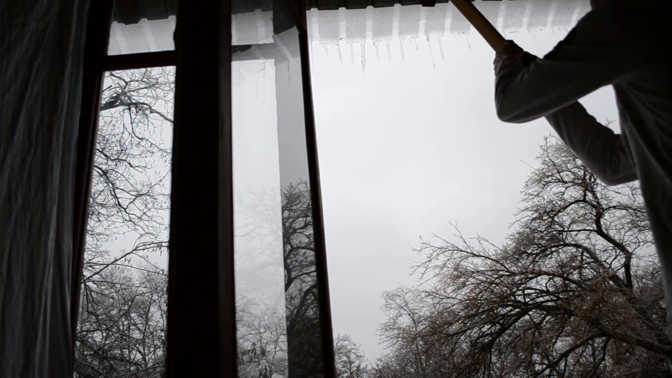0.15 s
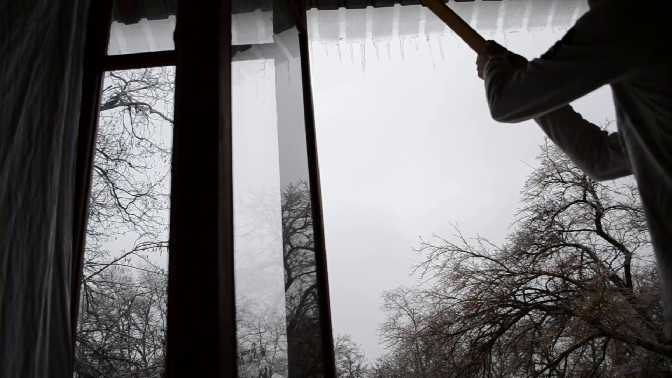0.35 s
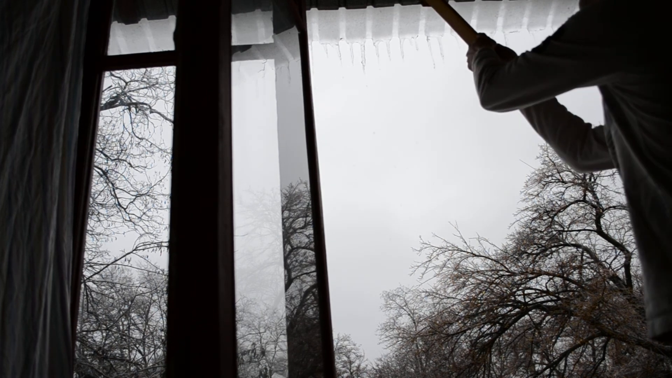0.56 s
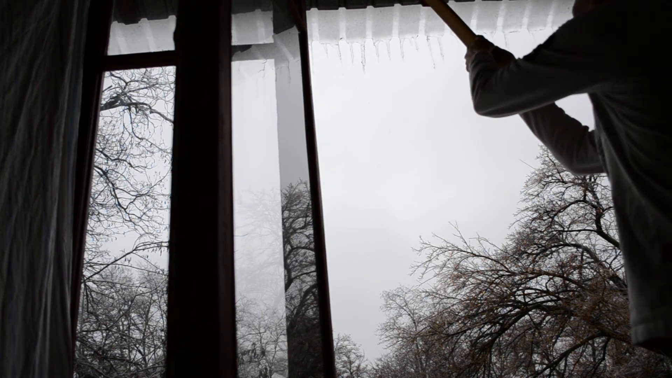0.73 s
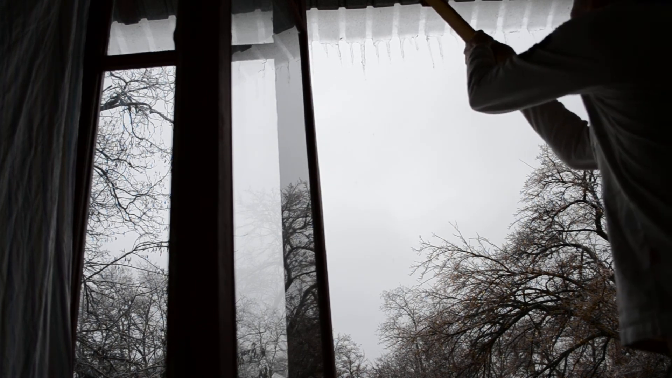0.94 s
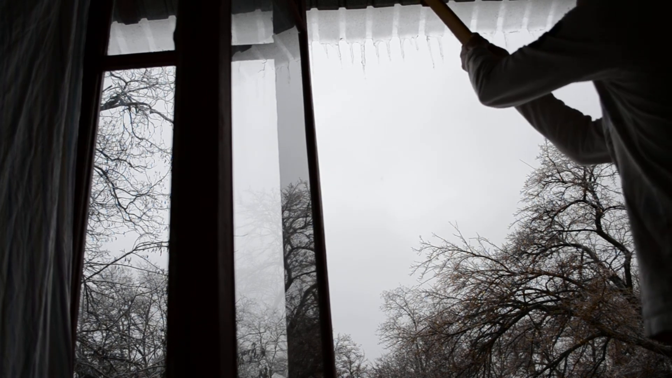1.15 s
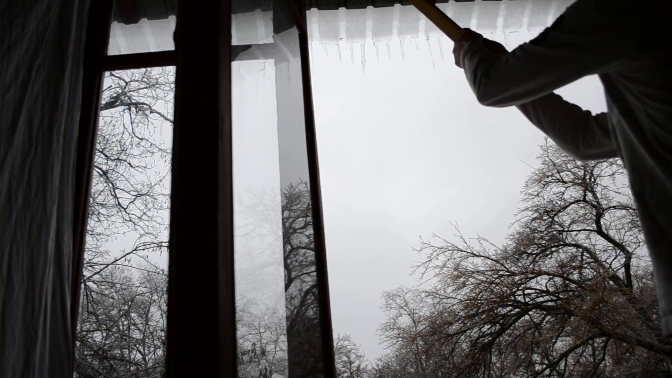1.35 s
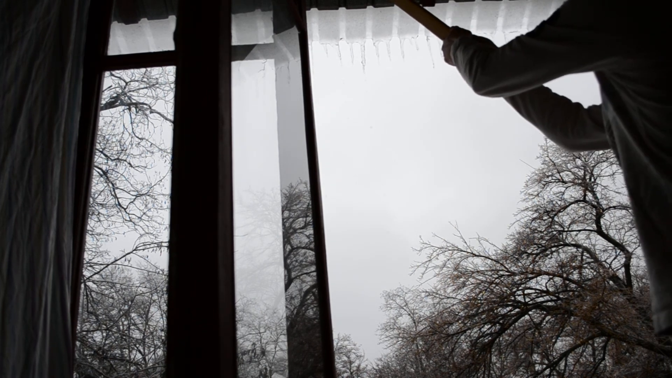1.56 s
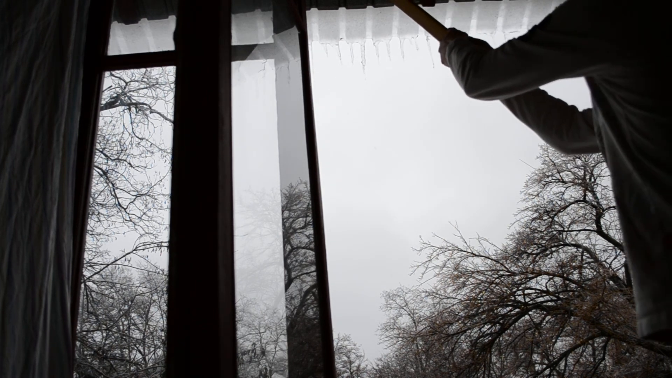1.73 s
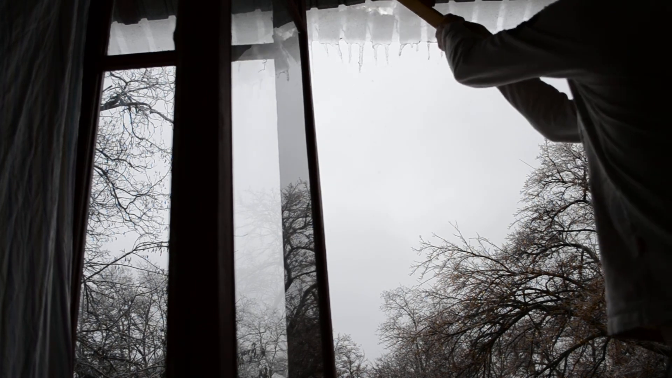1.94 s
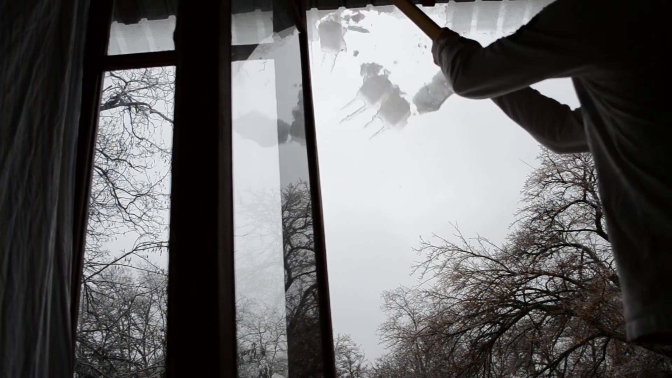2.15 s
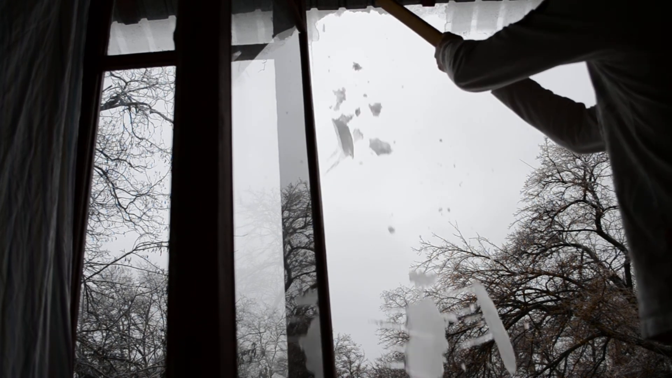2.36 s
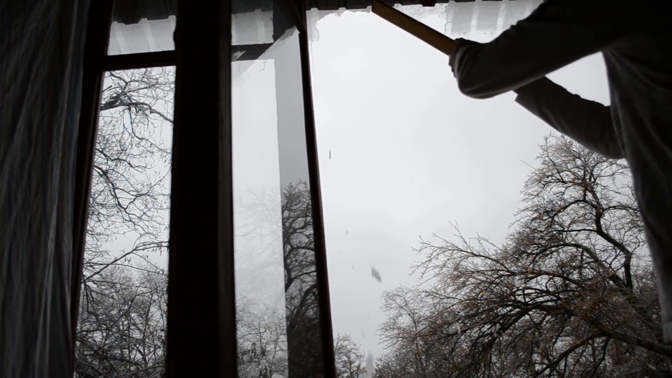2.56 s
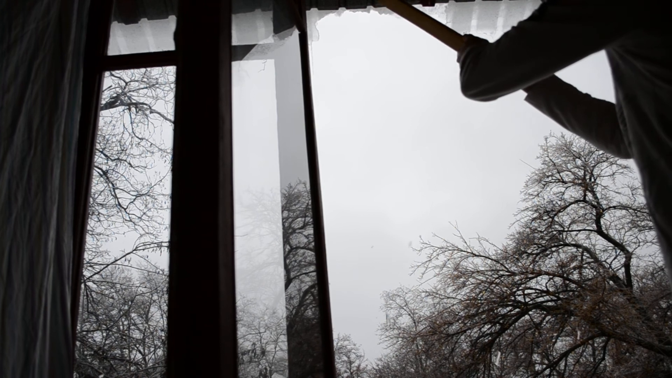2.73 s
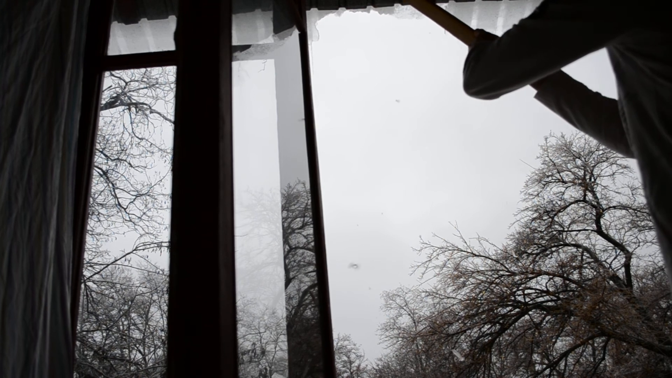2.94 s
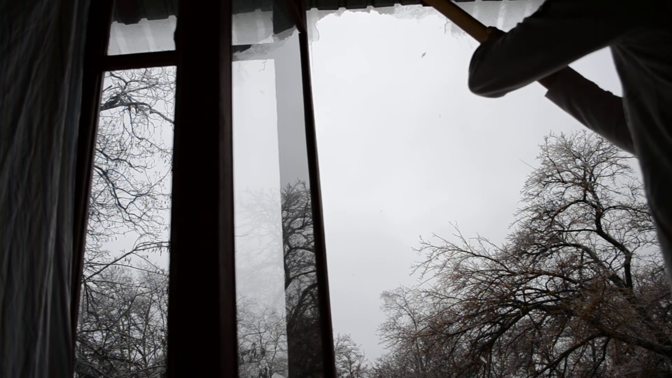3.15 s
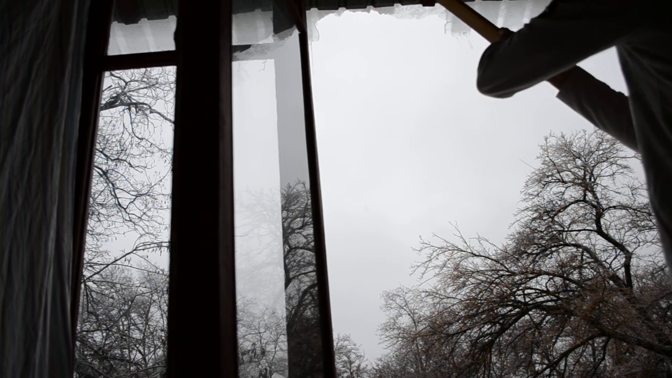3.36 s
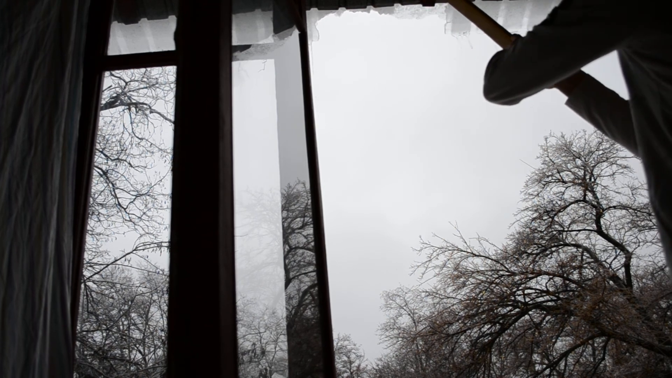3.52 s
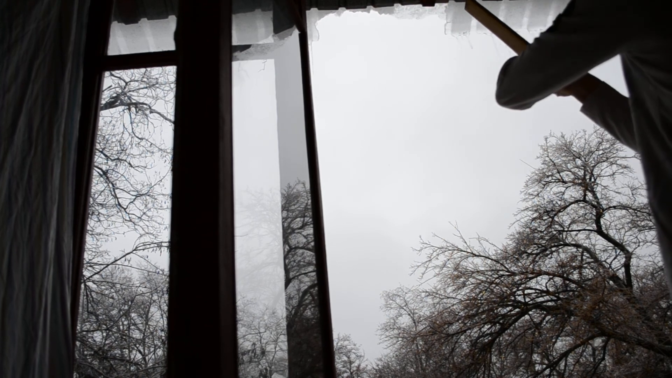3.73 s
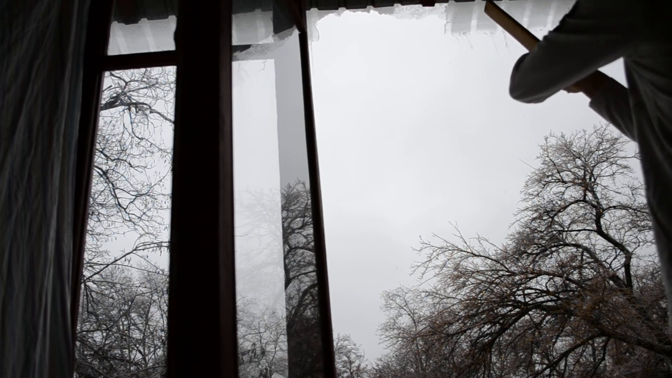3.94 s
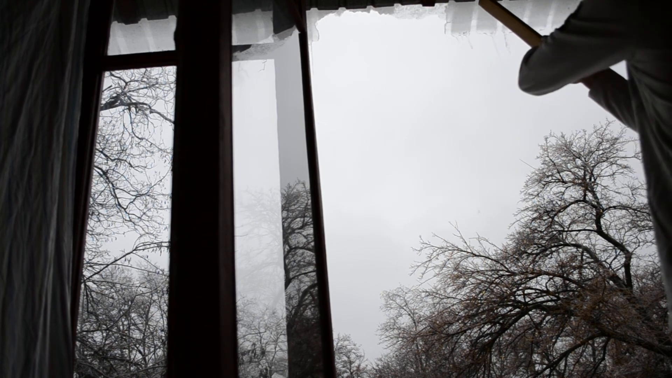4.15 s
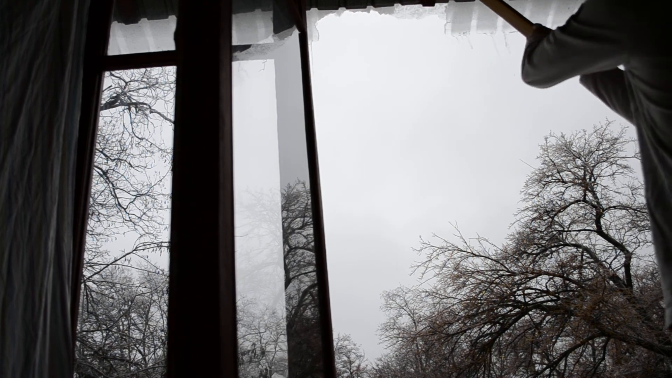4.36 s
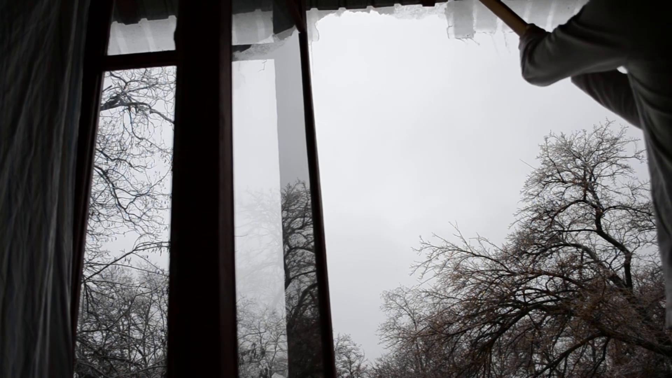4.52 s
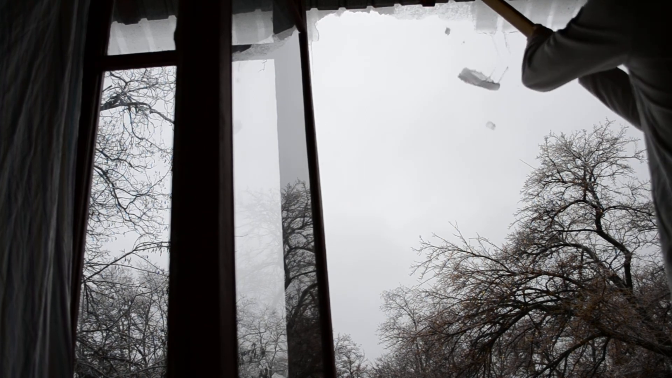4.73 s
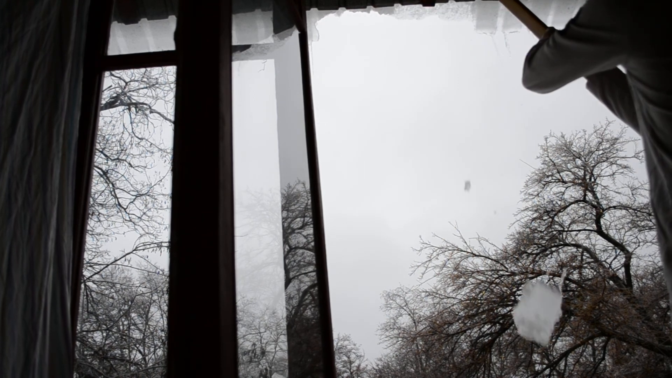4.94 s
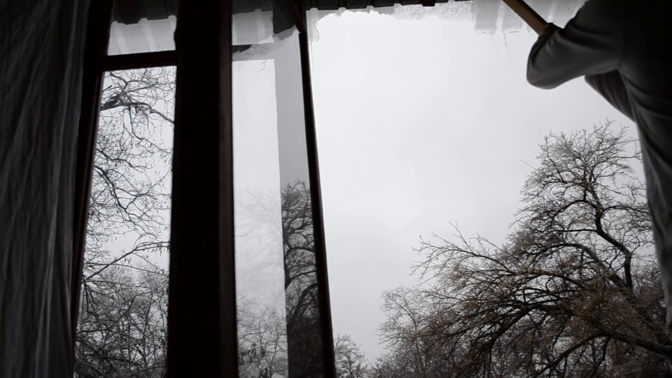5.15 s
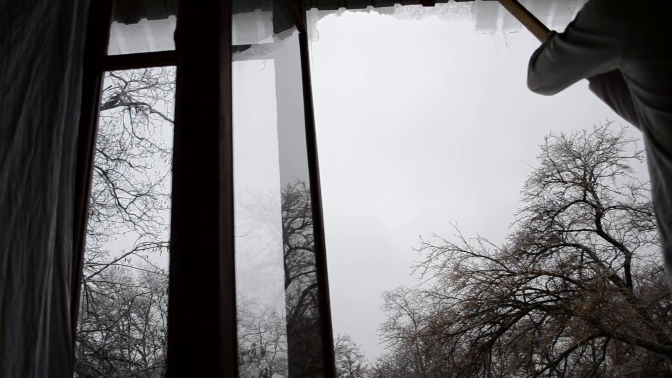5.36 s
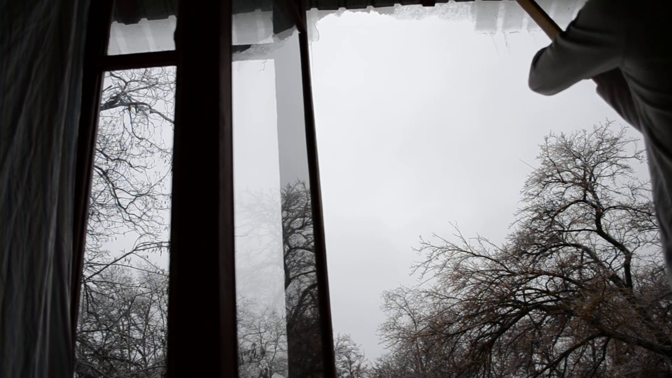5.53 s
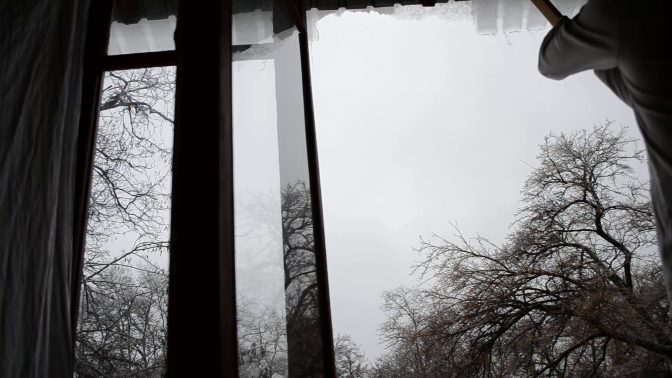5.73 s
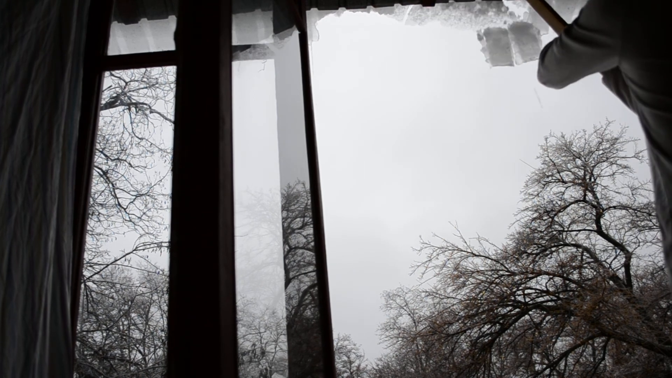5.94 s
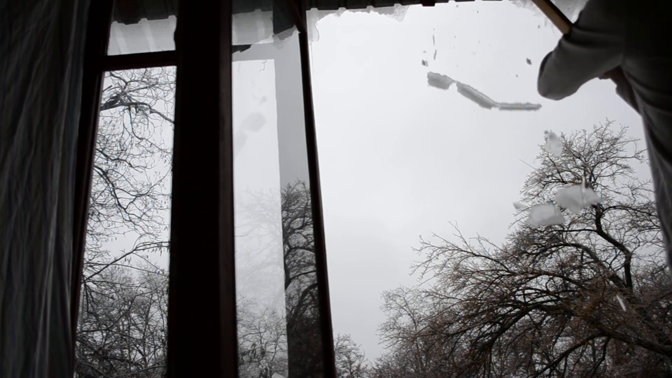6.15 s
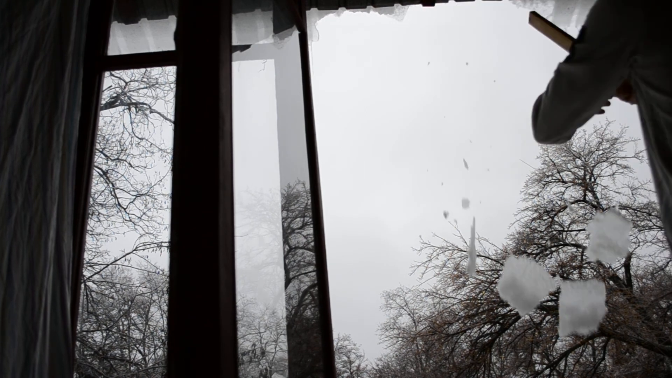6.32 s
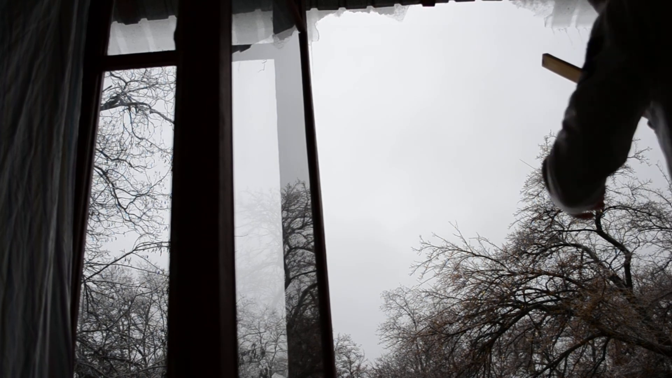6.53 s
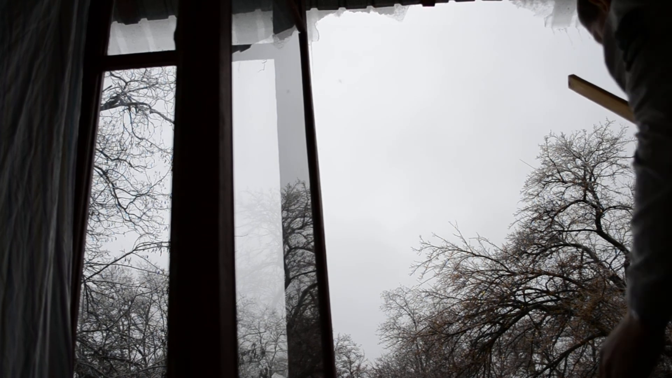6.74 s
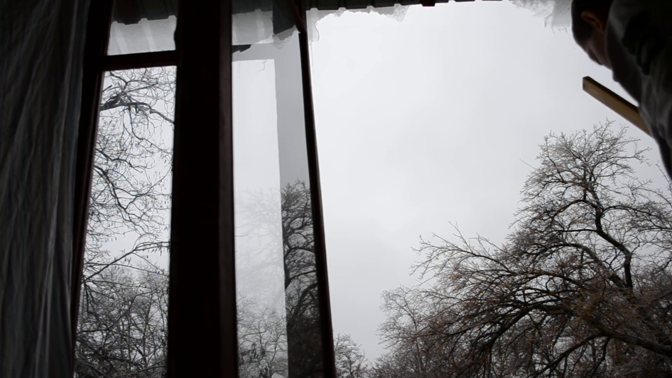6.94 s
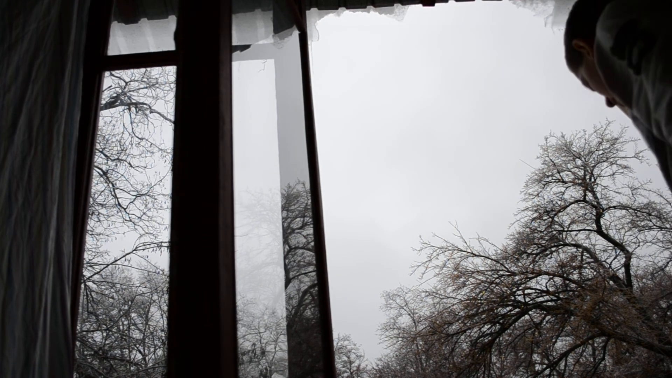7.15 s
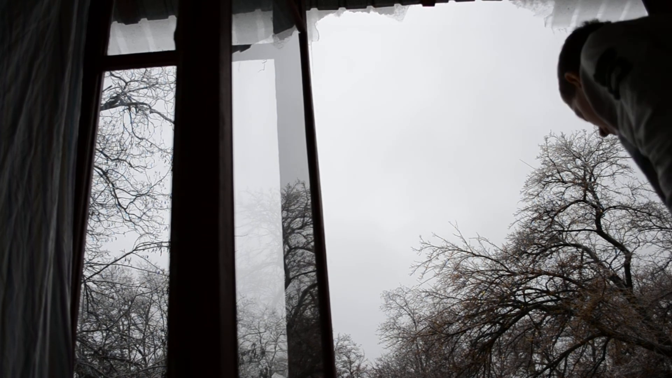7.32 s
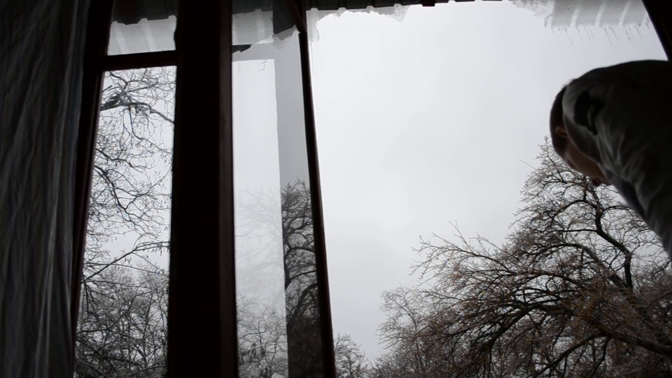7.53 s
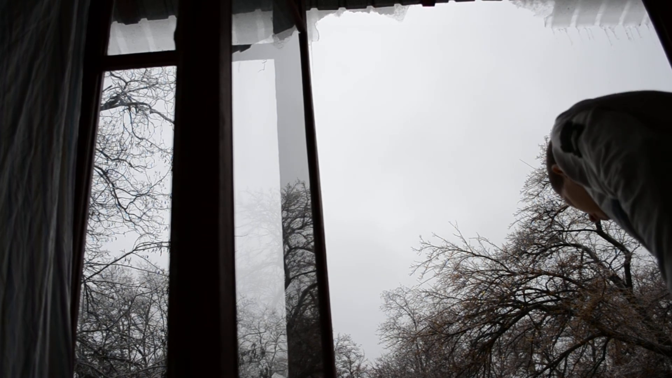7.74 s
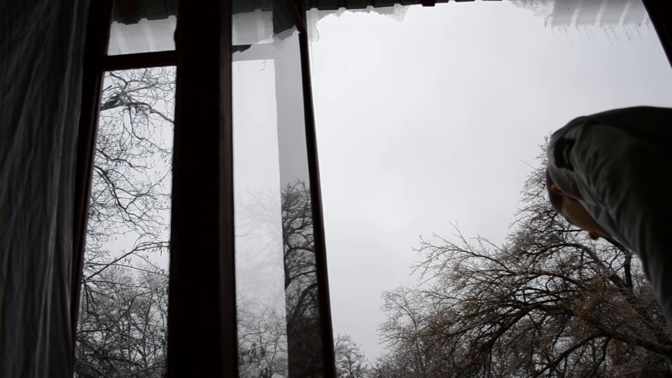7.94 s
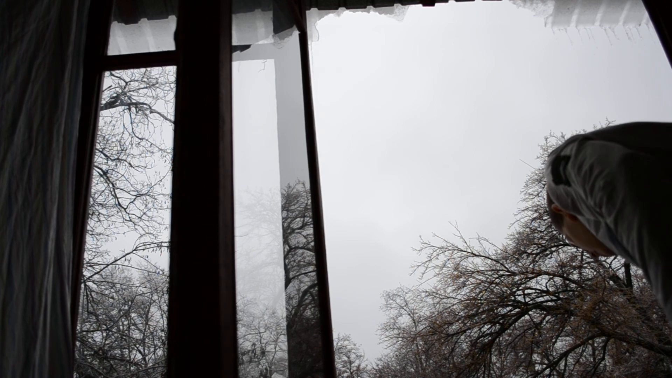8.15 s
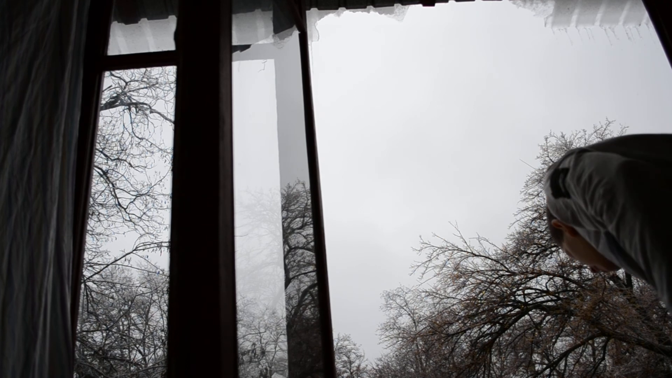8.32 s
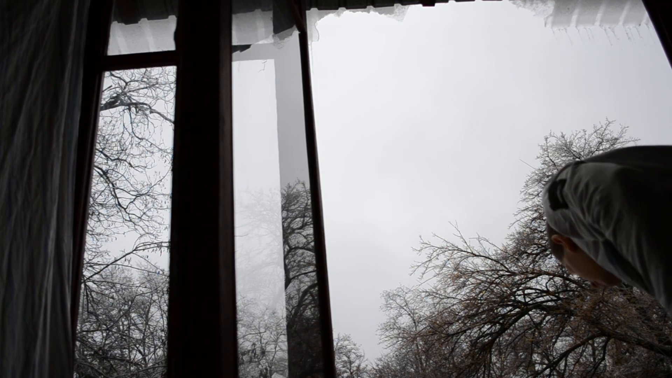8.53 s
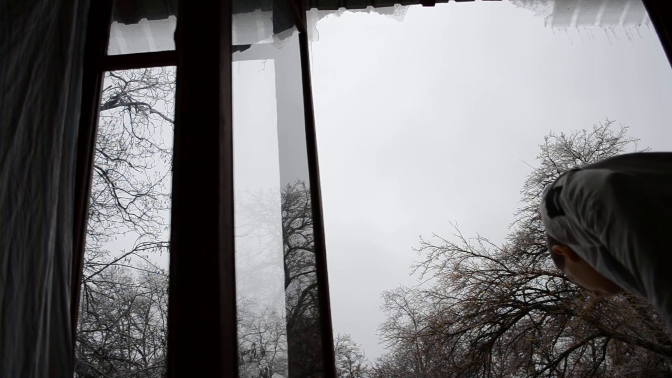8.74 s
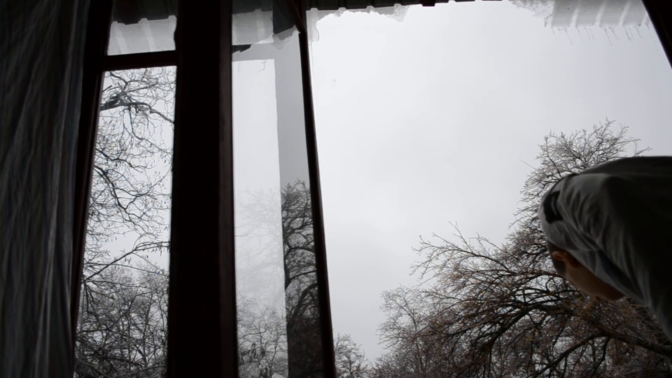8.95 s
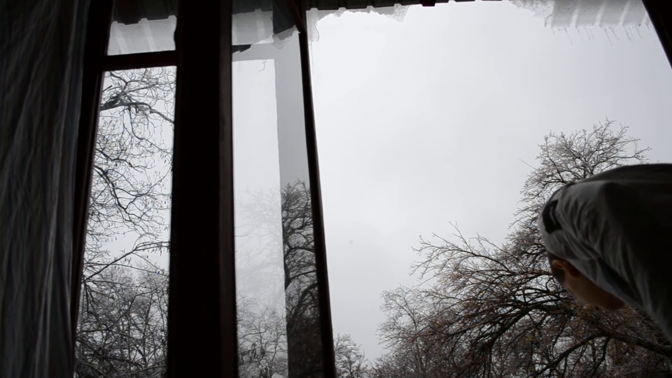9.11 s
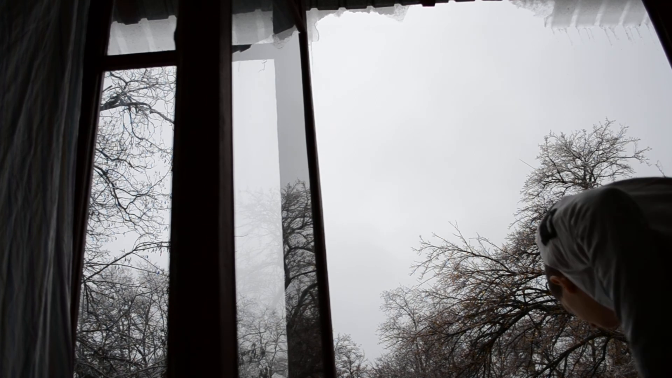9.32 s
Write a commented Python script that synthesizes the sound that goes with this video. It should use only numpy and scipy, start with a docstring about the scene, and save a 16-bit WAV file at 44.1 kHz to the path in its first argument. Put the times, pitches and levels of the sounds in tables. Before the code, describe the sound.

A wooden stick thuds on an icy eave; ice squeaks, cracks, tears loose and smashes below, then cloth rustles as a man bends.

```python
"""Over a faint winter hush, a wooden stick thuds on the eave: a man at a window knocks icicles off the roof edge.
Ice cracks, squeaks and tears loose, then smashes on the ground below and skitters away.
Late on, a footstep falls and his jacket rustles as he bends forward to look down; a few faint ticks stray in.
Hits are swells of tiny random clicks with short echoes; tearing, scatter and cloth are runs of noise grains.
Squeaks are rough sliding whistles, loose bits of ice clink like small bars, and the hush is filtered noise."""
import sys
import numpy as np
from scipy import signal
from scipy.fft import rfft, irfft, next_fast_len
from scipy.io import wavfile

SR = 44100
rng = np.random.default_rng(int(sys.argv[2]) if len(sys.argv) > 2 else 0)


def wav_record(signal):
    """Record a signal, one row per channel, as 16-bit PCM in the file named by sys.argv[1]."""
    frames = np.transpose(np.atleast_2d(signal))
    bounded = np.clip(frames, -1, 1)
    # unit amplitude maps onto the largest positive 16-bit level
    quanta = np.round(bounded * 32767).astype(np.int16)
    wavfile.write(sys.argv[1], SR, quanta)


N = 413658  # samples in the scene


def from_db(db):
    """Turn decibels into a plain gain."""
    return 10 ** (np.asarray(db) / 20)


def unit(x):
    """Scale a sound to an energy of one."""
    return x / np.sqrt(np.sum(x ** 2) + 1e-20)


def at_hz(points, hz):
    """Read a spectrum between its points, along a logarithmic pitch axis."""
    point_hz, point_db = np.transpose(points)
    return np.interp(np.log(np.maximum(hz, 1)), np.log(point_hz), point_db)


def coloured(x, points):
    """Filter to the given spectrum without any sound before the event (minimum phase)."""
    n = 2 * next_fast_len(len(x) // 2 + 1)
    gain = from_db(at_hz(points, np.fft.rfftfreq(n, 1 / SR)))
    cepstrum = irfft(np.log(gain))
    # folding the second half onto the first makes the filter causal
    cepstrum[1:n // 2] *= 2
    cepstrum[n // 2 + 1:] = 0
    response = np.exp(rfft(cepstrum))
    return irfft(rfft(x, n) * response)[:len(x)]


def resonate(x, modes):
    """Lift or dip a narrow band for each resonance."""
    for hz, width_hz, db in modes:
        b, a = signal.iirpeak(hz, hz / width_hz, fs=SR)
        x = x + (from_db(db) - 1) * signal.lfilter(b, a, x)
    return x


def evened(burst):
    """Give all parts of the spectrum about the same power, but keep the fine ripple."""
    power, hz = np.abs(rfft(burst)) ** 2, np.fft.rfftfreq(len(burst), 1 / SR)
    correction = []
    for centre in np.geomspace(100, 12000, 12):
        nearby = abs(hz - centre) < 60 + centre / 4
        correction.append((centre, -10 * np.log10(power[nearby].mean())))
    return coloured(burst, correction)


# edges of the four pitch ranges, from low to high: thump, body, crack, splinter (f/Hz)
RANGE_EDGES_HZ = [130, 400, 1200, 4000, 11000]
RANGE_HZ = np.sqrt(np.multiply(RANGE_EDGES_HZ[:-1], RANGE_EDGES_HZ[1:]))  # middle of each range


def range_spectrum(levels, rumble_db):
    """Spread four range levels into a spectrum, with a hollow below the thump and a deep rumble under it."""
    thump, body, crack, splinter = (db - 10 * np.log10(2 * width / SR)
                                    for db, width in zip(levels, np.diff(RANGE_EDGES_HZ)))
    # light objects lose their bass sooner than heavy ones
    weight = np.clip(thump - body, -10, 2)
    bass = thump + 0.42 * weight
    return [(18, bass + rumble_db - 9.5), (38, bass + rumble_db), (68, bass - 21), (185, bass),
            (300, thump - 0.078 * weight), (680, body), (1350, (body + crack) / 2 - 1),
            (2800, crack), (5200, splinter), (10500, splinter - 7)]


def voiced(colour, db, brightness=0, focus=0):
    """Set four range levels: a colour tilted around the crack range and narrowed towards it."""
    octaves = np.log2(RANGE_HZ / RANGE_HZ[2])
    return db + np.array(colour) + brightness * octaves - focus * np.array([1.5, 1, 0, 1])


def runs(events, lasts=1):
    """Each run rises, holds and dies away; overlaps add up to rows of (t/s, four range levels/dB)."""
    end = max(s + hold + t60 / 2 for s, _, hold, t60, _ in events)
    t = np.arange(events[0][0], end, .002)
    power = 1e-10
    for s, rise, hold, t60, levels in events:
        age = t[:, None] - s
        fall_db = -60 * np.maximum(age - rise - hold, 0) / (t60 * np.array(lasts))
        power = power + (np.clip(age / rise, 0, 1) * from_db(levels + fall_db)) ** 2
    return np.column_stack([t, 10 * np.log10(power)])


def grains(size, per_s, spread_db):
    """Random clicks, many small and a few large."""
    sizes = from_db(spread_db * np.minimum(rng.exponential(1, size), 4))
    signs = rng.choice([-1, 1], size)
    return sizes * signs * (rng.random(size) < per_s / SR)


# time for the echoes to fade by 60 dB, in the window recess and in the room behind it
RECESS_T60_S, ROOM_T60_S = 0.09, 0.32


def strikes(rows, contact, echo_db, tail_db, rumble_db, ring_db=0, ring_q=1):
    """A first contact and a swell of tiny clicks, echoed by the window recess and the room."""
    out, t = np.zeros(N + SR), np.arange(SR // 2) / SR
    click = 1.0 * (t == 0)
    for s, swell, *ring_hz, thump, body, crack, splinter in rows:
        age = t / max(swell, 1 / SR)
        tiny_clicks = unit(grains(len(t), 9000, 1.52) * age * np.exp(-age))
        # echoes start a few thousandths of a second after the hit
        recess = unit(grains(len(t), 4000, 2.64) * from_db(-60 * t / RECESS_T60_S) * (t > .003))
        room = unit(rng.standard_normal(len(t)) * from_db(-60 * t / ROOM_T60_S) * (t > .012))
        space = click + from_db(echo_db) * recess + from_db(tail_db) * room
        # the first contact is a dull push, weaker in a slow swell; the treble comes from the tiny clicks
        push = contact * np.exp(-swell / 0.007) * unit(np.exp(-6 * age))
        burst = evened(signal.fftconvolve(push + tiny_clicks, space)[:len(t)])
        # the spot that is hit decides which resonance speaks most
        burst = resonate(burst, [(hz, hz / ring_q, ring_db) for hz in ring_hz])
        burst = coloured(burst, range_spectrum((thump, body, crack, splinter), rumble_db))
        start = round(s * SR)
        # a level is the strike's energy spread over a fiftieth of a second
        out[start:start + len(t)] += burst * np.sqrt(SR / 50)
    return out[:N]


def crunch(rows, per_s, spread_db, grain_s, together, blur, rumble_db):
    """Short noise grains: some sound in all bands at once, some in one band, the far ones blur to a hiss."""
    s, *levels = np.transpose(rows)
    start, stop = int(s[0] * SR), min(int(s[-1] * SR), N)
    t, out = np.arange(start, stop) / SR, np.zeros(N)
    anchors, curves = zip(*range_spectrum(levels, rumble_db))
    shared = grains(len(t), per_s, spread_db) ** 2
    edges = np.geomspace(24, 12288, 16)
    together, blur = np.clip([together, blur], 0, 1)
    for low, high in zip(edges, edges[1:]):
        hz = np.sqrt(low * high)
        db = [np.interp(np.log(hz), np.log(anchors), row) for row in np.transpose(curves)]
        own = grains(len(t), per_s, spread_db) ** 2
        hits = together * shared + (1 - together) * own
        # low grains ring longer than high ones; grain_s holds at 2000 Hz
        fade = np.exp(-2 / (grain_s * np.sqrt(2000 / hz) * SR))
        patter = signal.lfilter([1], [1, -fade], hits + 1e-18)
        power = blur + (1 - blur) * patter / patter.mean()
        drive = rng.standard_normal(len(t)) * np.sqrt(power) * from_db(np.interp(t, s, db))
        band = signal.butter(2, [low, high], "band", fs=SR, output="sos")
        out[start:stop] += signal.sosfilt(band, drive)
    return out


# outdoor hush, its colour: (f/Hz, level per Hz/dB, relative)
HUSH = [(20, -22), (42, 1.5), (75, -12), (170, -5.5), (450, -2), (800, -4.5), (1400, -5.5), (3000, -10.5),
        (5500, -14), (10000, -22.5)]
HUSH_DB = -56.5  # average (rms) level before the microphone colour


def hush():
    """Steady distant noise, made by filtering random noise to a fixed colour."""
    return from_db(HUSH_DB) * np.sqrt(N) * unit(coloured(rng.standard_normal(N), HUSH))


# quick scuffs of the jacket, and a few faint stray ticks:
# (t/s, swell time/s, level/dB, brightness/dB per octave)
SCUFFS_AND_TICKS = [(1.398, 0.0029, -57.5, 2.5), (6.202, 0.0013, -60, -3.5), (7.079, 0.0015, -45, -.5),
                    (7.199, .0015, -41, 3), (7.238, 0.0038, -36, -0.5), (7.351, 0.0053, -41.5, 2),
                    (7.498, 0.0074, -39, 0), (7.78, 0.0013, -52.5, -4.5), (7.943, 0.0054, -43, 0),
                    (8.014, 0.00092, -50, -2.5), (8.11, 0.0016, -54, -1.5), (8.188, 0.0032, -48.5, -1.5),
                    (8.445, 0.0018, -60, 4), (8.949, 0.002, -65, 7)]
# jacket rubbing as he bends forward: (t/s, level/dB)
RUSTLE = [(6.95, -72), (7.012, -49.5), (7.5, -41.5), (7.91, -47.5), (8.212, -59), (8.7, -63)]
# colours of scuffs and ticks, and of rubbing: (thump, body, crack, splinter; each level/dB, relative)
SCUFF_DB = [-15, -1.5, 1.5, 1]
RUSTLE_DB = [-21.5, -9, -9, -5]
# papery colour of the whole layer: (f/Hz, width/Hz, gain/dB)
CLOTH = [(1500, 430, 5.5)]
# a soft slide follows each scuff or tick; its level is relative to that row
SLIDE_RISE_S, SLIDE_T60_S, SLIDE_DB = 0.026, 0.4, -12


def jacket_and_ticks():
    """Cloth rubs in fine grains, catches in quick scuffs and slides on; a few faint stray ticks sound alike."""
    scuffs = [(s, swell, *voiced(SCUFF_DB, db, brightness)) for s, swell, db, brightness in SCUFFS_AND_TICKS]
    slides = runs([(s, SLIDE_RISE_S, 0, SLIDE_T60_S, voiced(SCUFF_DB, db + SLIDE_DB))
                   for s, _, db, _ in SCUFFS_AND_TICKS])
    rubbing = [(s, *voiced(RUSTLE_DB, db)) for s, db in RUSTLE]
    layer = strikes(scuffs, contact=0.4, echo_db=-5.5, tail_db=-5, rumble_db=-10)
    for levels in (slides, rubbing):
        layer += crunch(levels, per_s=550, spread_db=9, grain_s=0.0038,
                        together=0.83, blur=0.54, rumble_db=-23)
    return resonate(layer, CLOTH)


# thin falling squeaks just before the ice gives: (t/s, length/s, start f/Hz, end f/Hz, level/dB)
SQUEAKS = [(0.66, 0.18, 4100, 3110, -59), (1.268, .14, 3180, 3150, -70), (1.673, 0.15, 4000, 3350, -52.5)]


def squeaks(width_hz):
    """A rough, narrow whistle slides down: a sine whose strength wavers at random."""
    out = np.zeros(N)
    for s, length, from_hz, to_hz, db in SQUEAKS:
        n, start = int(length * SR), int(s * SR)
        slow = signal.butter(2, width_hz, fs=SR, output="sos")
        waver = signal.sosfilt(slow, rng.standard_normal(n))
        tone = waver * np.sin(2 * np.pi * np.cumsum(np.geomspace(from_hz, to_hz, n)) / SR)
        out[start:start + n] += from_db(db) * np.sqrt(n) * unit(tone * signal.windows.tukey(n))
    return out


# shoves of the stick that tear ice off the roof edge:
# (t/s, rise/s, time to fade by 60 dB/s, level/dB, brightness/dB per octave)
TEARS = [(0.70, 0.013, 3, -50, 0.5), (1.005, .01, 0.13, -58, -5), (1.07, 0.0089, 0.31, -55, -2.5),
         (1.746, 0.013, .4, -46, 1), (1.79, 0.029, 0.65, -37, -1), (1.825, 0.036, 0.37, -28, -0.1),
         (1.903, 0.0085, 0.17, -39.5, -1), (1.96, 0.018, 0.4, -32.5, -0.5), (4.399, 0.016, 0.36, -37, -1.5),
         (4.6, 0.043, 1.25, -52, -1), (4.77, 0.0097, 0.21, -55, -1), (5.17, 0.0081, 1.65, -51, -4),
         (5.283, 0.0039, 0.21, -43.5, 0), (5.73, 0.011, 1.3, -37.5, -1), (5.828, .015, 0.22, -31.5, -.5),
         (5.909, .02, 0.19, -35, -1.5)]
# colour of tearing ice: (thump, body, crack, splinter; each level/dB, relative)
TEAR_DB = [-7, -1.5, -1.5, -4]


def tearing():
    """Each shove builds up a grinding crunch that dies as the ice lets go."""
    levels = runs([(s, rise, 0, t60, voiced(TEAR_DB, db, brightness))
                   for s, rise, t60, db, brightness in TEARS])
    return crunch(levels, per_s=510, spread_db=5.5, grain_s=0.0082, together=0.41, blur=0.23, rumble_db=-9)


# ice snapping or striking: (t/s, swell time/s, level/dB, brightness/dB per octave, midrange focus/dB)
SHARDS = [(0.736, 0.0022, -41.5, -1, 3.5), (0.792, 0.00068, -46.5, 1.5, 0.5), (0.801, 0.0021, -47, -2, 0),
          (0.893, 0.0012, -41.5, -0.5, -0.5), (0.901, 0.0038, -41.5, -0.5, 2.5),
          (0.934, .0012, -48.5, -1, -2.5), (1.79, 0.00063, -46, 7, 9), (1.8, 0.0013, -36.5, 5.5, 8),
          (2.516, 0.0031, -33, 3.5, 4), (2.61, 0.0034, -22, -1, 6), (2.637, 0.0025, -29, -2.5, 3),
          (2.847, 0.0028, -36.5, -3, -5.5), (2.948, 0.0031, -33, 5.5, 13), (2.974, 0.0016, -47, 0.5, -9.5),
          (2.992, 0.0011, -30.5, 5.5, 16), (3.031, 0.0026, -40.5, 5.5, 5.5), (3.139, 0.0068, -41.5, 4.5, 6),
          (3.287, 0.00092, -45.5, 1.5, -2), (3.366, 0.00041, -9, 2.5, 19.5), (3.4805, 0.00048, -24, 1, 4.5),
          (3.499, 0.0011, -29, 1, 6.5), (3.56, 0.00073, -40.5, 3.5, 1), (3.576, .0037, -29, -5, 12),
          (3.62, 0.00043, -37, 3, 8), (3.695, 0.0014, -30, 2.5, 13.5), (3.748, 0.00065, -32, 5, 17),
          (3.848, 0.0077, -23, -1.5, 8), (4.03, 0.0081, -38, 0, 6.5), (4.13, 0.0002, -63.5, 8.5, -7),
          (4.269, 0.00059, -40, 1, 7.5), (4.473, 0.0013, -37.5, -5, 18), (4.821, 0.00056, -52, -3, 6.5),
          (6.342, .001, -42, -5, 17), (6.778, 0.0013, -60, 10, -3), (6.789, 0.0052, -32.5, 3, 2),
          (6.851, 0.0054, -40, 2, 1.5), (6.923, 0.00099, -35.5, 0.9, 3.5), (6.982, .001, -42, 8.5, 17)]
# colour of a snap: (thump, body, crack, splinter; each level/dB, relative)
SHARD_DB = [-15, -3, -1, 1]


def snaps():
    """Single sharp cracks of ice, each a quick swell of fractures."""
    rows = [(s, swell, *voiced(SHARD_DB, db, brightness, focus))
            for s, swell, db, brightness, focus in SHARDS]
    return strikes(rows, contact=0.2, echo_db=-6.5, tail_db=-18, rumble_db=-32)


def pieces(rows, per_s, spread_db, cycles):
    """Single bits of ice tumble within a run; each clinks at its own pitch with the overtone of a free bar."""
    s, *levels = np.transpose(rows)
    out, t = np.zeros(N + SR), np.arange(SR // 10) / SR
    length_s = s[-1] - s[0]
    for when, size, force, overtone in rng.random((int(per_s * length_s), 4)):
        at, hz = s[0] + when * length_s, 600 * (7000 / 600) ** size
        range_db = [np.interp(at, s, level) for level in levels]
        db = np.interp(np.log(hz), np.log(RANGE_HZ), range_db)
        # each tone fades by 60 dB over the given number of cycles
        clink = sum(gain * np.sin(2 * np.pi * f * t) * from_db(-60 * f * t / cycles)
                    for f, gain in ((hz, 1), (2.76 * hz, overtone)))
        start = int(at * SR)
        out[start:start + len(t)] += from_db(db + spread_db * (force - 1.5)) * clink
    return out[:N]


def chips(rows, per_s, spread_db, tick_s, low_hz):
    """Sharp little ticks of splinters: noise bursts that follow the treble level of the run that sheds them."""
    s, *_, splinter = np.transpose(rows)
    splinter_db = np.interp(np.arange(N) / SR, s, splinter, left=-99, right=-99)
    clicks = grains(N, per_s, spread_db) * from_db(splinter_db)
    envelope = signal.lfilter([1], [1, -np.exp(-1 / (tick_s * SR))], clicks + 1e-18)
    bass_cut = signal.butter(1, low_hz, "high", fs=SR, output="sos")
    return signal.sosfilt(bass_cut, envelope * rng.standard_normal(N))


# loads of ice that smash below and scatter: (t/s, rise/s, hold/s, time to fade by 60 dB/s, level/dB,
# brightness/dB per octave, extra thump level/dB); the fading time is scaled by FALL_LASTS
FALLS = [(2.465, 0.0057, 0.056, 0.36, -42, -1, -1.5), (2.504, .012, .02, 0.18, -34, 4, 15),
         (2.516, .04, 0.14, 1.99, -34, -0.6, 0), (2.98, 0.054, 0.46, 1.2, -48, 1.5, -1.5),
         (3.464, 0.027, 0.42, 1.62, -44.5, 0, -14.5), (5.366, 0.01, .02, 0.51, -47, 5.5, 7),
         (6.096, 0.14, .15, 2.4, -53, 1.5, -6), (6.394, .02, 0.084, 0.57, -53, -4, -4.5),
         (6.489, 0.019, 0.11, 0.36, -50, -2.5, -1), (6.637, 0.0039, 0.047, 2, -43, 1.5, 1)]
# colour of falling ice: (thump, body, crack, splinter; each level/dB, relative)
FALL_DB = [0, 0, 0, 0]
# big pieces come to rest first: (thump, body, crack, splinter; each a share of the fading time)
FALL_LASTS = [.65, .85, 1.0, 1.1]


def falling_ice():
    """Each load smashes into a patter of grains, with single bits clinking and ticking among them."""
    levels = runs([(s, rise, hold, t60, voiced(FALL_DB, db, brightness) + [weight, 0, 0, 0])
                   for s, rise, hold, t60, db, brightness, weight in FALLS], FALL_LASTS)
    scatter = crunch(levels, per_s=380, spread_db=5.5, grain_s=0.0088, together=0.4, blur=.26, rumble_db=2)
    clinks = pieces(levels, per_s=120, spread_db=13.5, cycles=95)
    ticks = chips(levels, per_s=50, spread_db=4.5, tick_s=0.00071, low_hz=1500)
    return scatter + from_db(13.5) * clinks + from_db(1.5) * ticks


# thuds on the eave, the window frame and below, and a late footstep, before the trim in blows_and_footstep():
# (t/s, main ring f/Hz, body level/dB, thump level against body/dB, treble slope/dB per octave)
THUDS = [(0.539, 590, -29, -7, -8), (0.737, 910, -40, -25, -3), (1.578, 705, -34, -15, -8.5),
         (2.579, 490, -28, -4, -17), (3.139, 790, -42, -14, -3), (3.421, 777, -9.5, -26, -10.5),
         (4.384, 730, -28.5, -7, -3.5), (4.538, 690, -37, -20, -6), (4.583, 560, -36.5, -8, -2),
         (4.704, 547, -51, 1.5, -0.5), (5.118, 215, -28.5, -4, -4), (5.329, 806, -38, -7, -6.5),
         (5.688, 137, -29.5, 4, -6.5), (6.484, 255, -38, 4, -2), (7.635, 216, -37, -1.5, -2.5)]
THUD_SWELL_S = 0.00097
# crunches after a blow or footstep, before the same trim:
# (t/s, swell time/s, main ring f/Hz, level/dB, brightness/dB per octave, midrange focus/dB)
CRUNCHES = [(1.586, 0.00093, 596, -36, -.4, -1.5), (1.894, 0.0018, 202, -31, 0, -4),
            (2.045, 0.0015, 2060, -28.5, 1.3, -0.5), (2.056, 0.0018, 1620, -27, -1.5, 7.5),
            (2.233, 0.0093, 196, -46.5, -1.2, -2.5), (3.428, 0.0037, 279, -18.5, -4, 10),
            (4.375, 0.0018, 1640, -30, 0.2, -1), (4.527, 0.0079, 536, -31.5, 0, 4),
            (4.581, 0.0022, 1500, -36, 3.4, 1), (5.127, 0.0043, 715, -29, -2, 9.5),
            (5.145, 0.0071, 537, -27.5, -1, 3), (5.692, 0.003, 1300, -20, .5, 4),
            (5.707, 0.0063, 2260, -22.5, -3.5, 6), (6.477, 0.0065, 1660, -37, 0.5, 0),
            (7.659, 0.0049, 450, -37.5, 0.5, 1.5)]
# colour of these crunches: (thump, body, crack, splinter; each level/dB, relative)
CRUNCH_DB = [-6, 2, 0.5, 0]


def blows_and_footstep():
    """Thuds change in treble at a steady slope; crunches are broad. Both ring the spot that is hit."""
    octaves = np.log2(RANGE_HZ[2:] / RANGE_HZ[1])
    thud_rows = [(s, THUD_SWELL_S, hz, db + bass_db, db, *(db + slope * octaves))
                 for s, hz, db, bass_db, slope in THUDS]
    crunch_rows = [(s, swell, hz, *voiced(CRUNCH_DB, db, brightness, focus))
                   for s, swell, hz, db, brightness, focus in CRUNCHES]
    thuds = strikes(thud_rows, contact=0.42, echo_db=0.5, tail_db=-14, rumble_db=-29,
                    ring_db=9, ring_q=9.5)
    crunches = strikes(crunch_rows, contact=0.29, echo_db=-2.5, tail_db=-17.5, rumble_db=-23,
                       ring_db=11.5, ring_q=17)
    return from_db(-1) * (thuds + crunches)


# resonances of eave and stick: (f/Hz, width/Hz, gain/dB)
EAVE = [(206.7, 12, 2), (308.7, 21, 0.5), (457.5, 9.1, 5), (2290, 9.5, 7.5), (2727, 40, 6.5)]
# microphone colour: (f/Hz, width/Hz, gain/dB)
MICROPHONE = [(7800, 300, -6), (8964, 530, 8.5)]


def scene():
    """Thuds, crunches and tearing share one set of resonances; the other sounds join them over the hush."""
    resonant = resonate(blows_and_footstep() + tearing(), EAVE)
    near = resonant + snaps() + falling_ice() + jacket_and_ticks() + squeaks(width_hz=130)
    return resonate(near + hush(), MICROPHONE)[None]


CUTOFF_HZ = 10750


def record(dry):
    """The top is cut and the hardest hits overload: their peaks bend smoothly towards a ceiling."""
    ceiling = .72
    narrow = signal.sosfilt(signal.butter(24, CUTOFF_HZ, fs=SR, output="sos"), dry)
    limited = narrow / (1 + (narrow / ceiling) ** 8) ** (1 / 8)
    # a second cut softens the harsh treble that overload adds
    return signal.sosfilt(signal.butter(10, 13500, fs=SR, output="sos"), limited)


dry = scene()
out = record(dry)
wav_record(out)
```